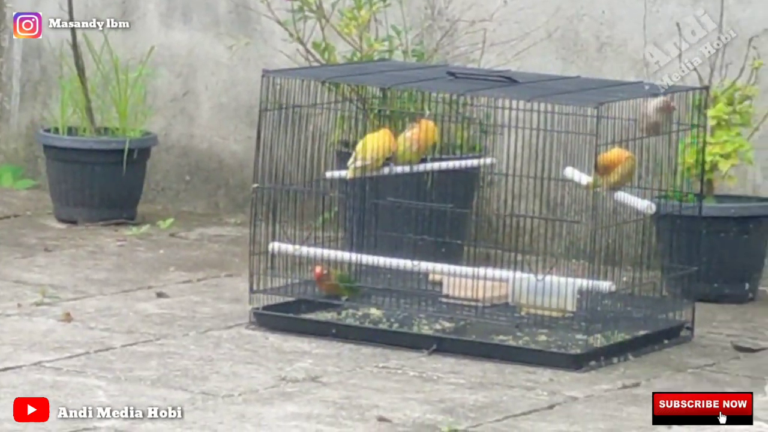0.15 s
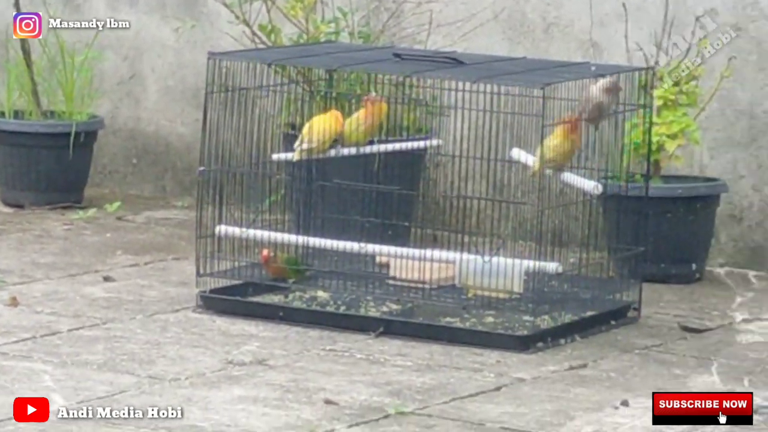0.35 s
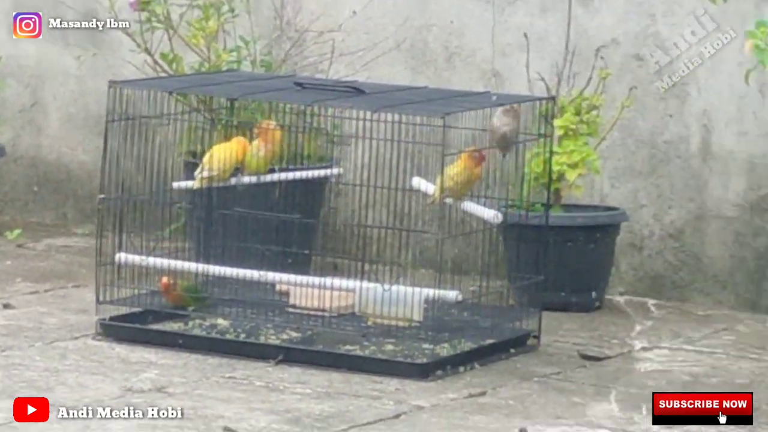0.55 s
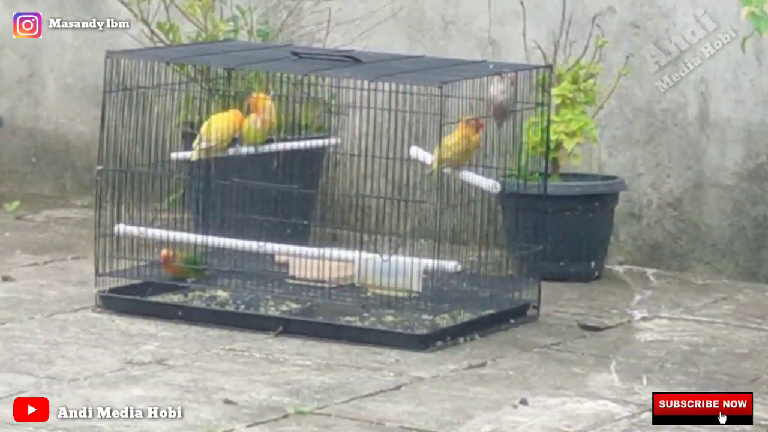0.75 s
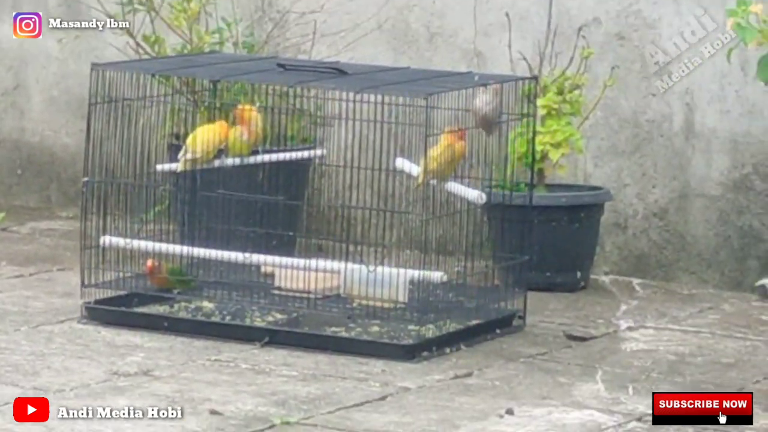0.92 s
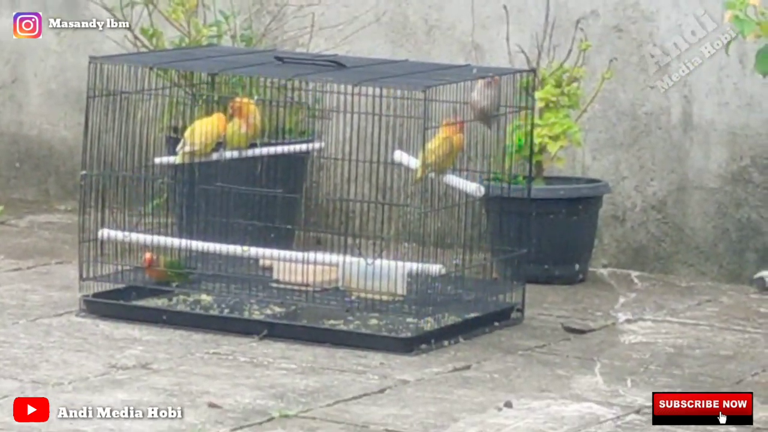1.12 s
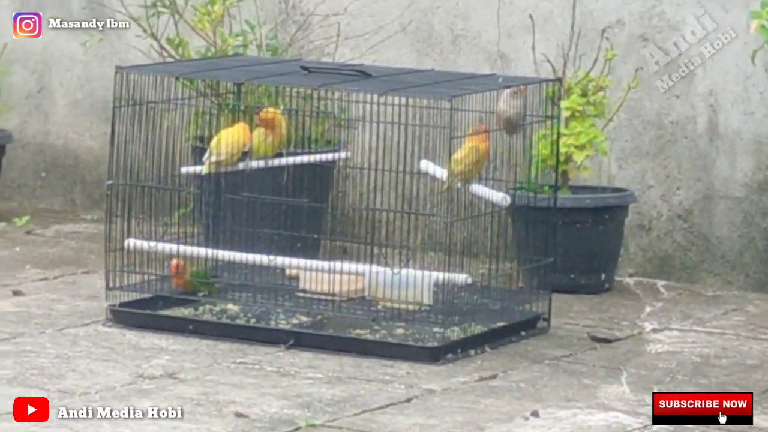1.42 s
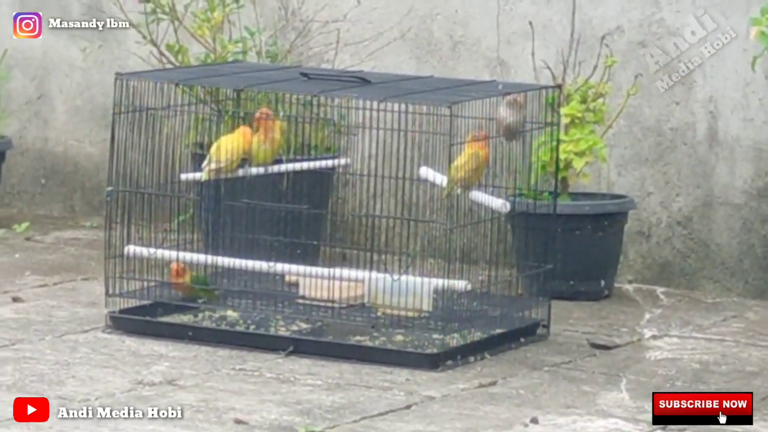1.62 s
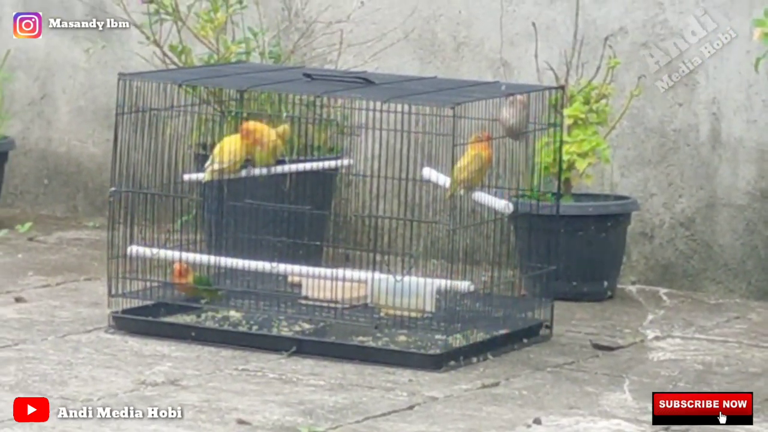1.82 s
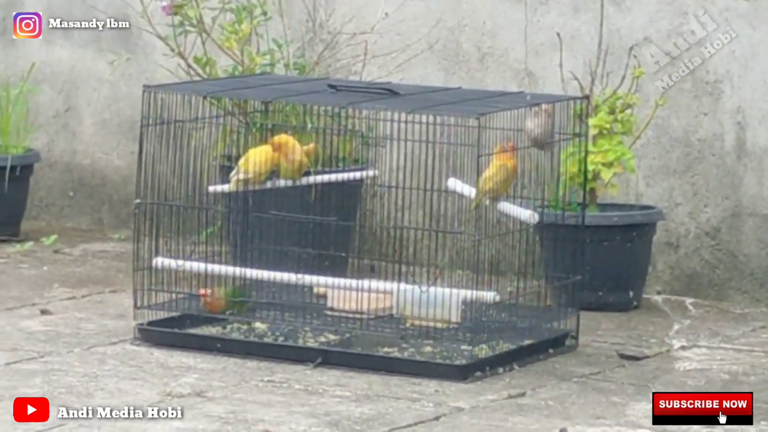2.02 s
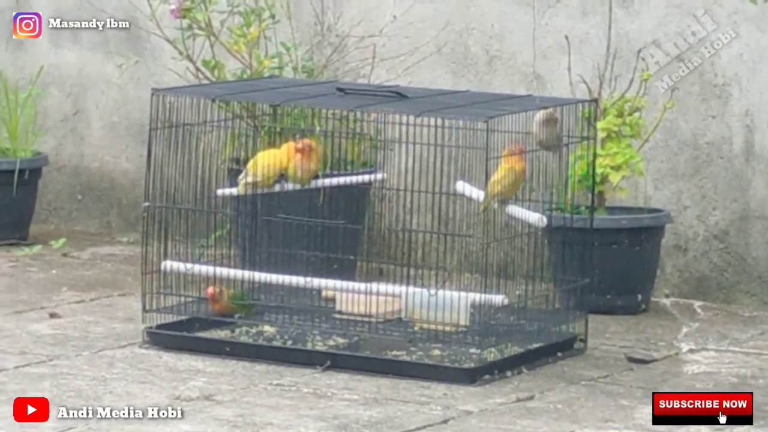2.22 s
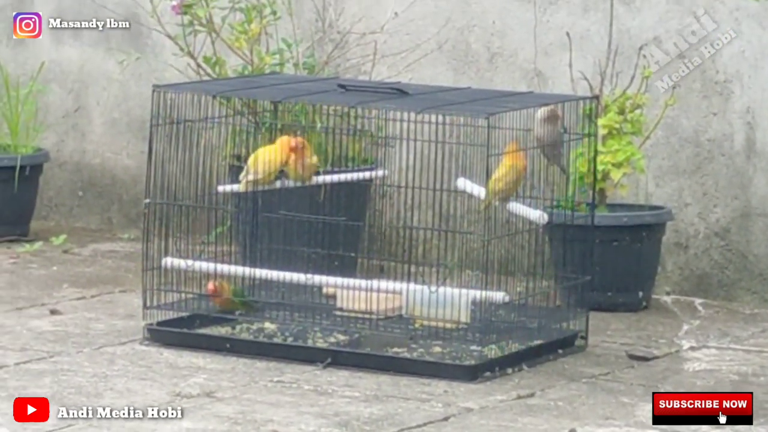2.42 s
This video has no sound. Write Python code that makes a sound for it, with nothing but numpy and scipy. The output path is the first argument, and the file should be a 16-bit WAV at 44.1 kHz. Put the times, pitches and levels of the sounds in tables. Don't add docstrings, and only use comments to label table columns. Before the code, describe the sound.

Bright, rapid parrot chatter with whistles, squeaks and hoarse notes rings in a walled yard over low distant traffic, with handling creaks at first and cage knocks, a hard click and a brief rustle near the end.

```python
import sys
import numpy as np
from scipy import signal
from scipy.fft import rfft, irfft
from scipy.io import wavfile
from scipy.ndimage import uniform_filter1d

SR = 44100
rng = np.random.default_rng(int(sys.argv[2]) if len(sys.argv) > 2 else 0)


def pcm_store(signal):
    levels = np.round(np.clip(np.atleast_2d(signal), -1, 1) * 32767)
    wavfile.write(sys.argv[1], SR, levels.astype(np.int16).T)


def ratio_of_db(decibels):
    return 10 ** (np.asarray(decibels, float) / 20)


N = 112454
TOP_HZ = 15700


def band(x, lo_hz, hi_hz, order=2):
    edges_hz = [lo_hz, min(hi_hz, 0.45 * SR)]
    return signal.sosfilt(signal.butter(order, edges_hz, "band", fs=SR, output="sos"), x)


def unit(x):
    return x / np.sqrt(np.mean(x ** 2))


def noise_band(size, lo_hz, hi_hz, order=2):
    return band(rng.standard_normal(size), lo_hz, hi_hz, order)


def walk(rate_hz, size=N):
    hold = max(int(SR / rate_hz), 1)
    steps = np.repeat(rng.standard_normal(size // hold + 1), hold)
    return 1.38 * uniform_filter1d(uniform_filter1d(steps, hold), hold)[:size]


def ring(hz, t60_s, size=3000):
    t = np.arange(size) / SR
    return np.sin(2 * np.pi * hz * t) * ratio_of_db(-60 * t / t60_s)


def add(out, start_s, x):
    i = int(start_s * SR)
    out[i:i + len(x)] += x[:N - i]


def town():
    # hz, level_db (per Hz)
    spectrum = [(15, -31), (25, -1.5), (183, 1), (313, -15), (945, -16), (5140, -25.5), (6550, -30.5),
                (15500, -48)]
    curve_hz, curve_db = np.array(spectrum).T
    t, swell = np.arange(N) / SR, walk(0.93)
    air = np.zeros(N)
    for hz in 28 * 2 ** np.arange(0, 9.5, 0.5):
        density_db = np.interp(np.log(hz), np.log(curve_hz), curve_db)
        level_db = density_db + 10 * np.log10(hz) + 1.2 * swell + 1.6 * walk(9)
        air += ratio_of_db(level_db) * unit(noise_band(N, hz / 1.208, hz * 1.22))
    hum_hz = 62 * (1 + 0.07 * walk(7.7))
    hum = np.sin(2 * np.pi * np.cumsum(hum_hz) / SR) * ratio_of_db(-51.5 + 2.5 * walk(6.74))
    moving = np.clip((0.55 - t) / 0.047, 0, 1) + 1.7 * np.clip((t - 2.49) / 0.054, 0, 1)
    rumble = ratio_of_db(-50) * moving * unit(noise_band(N, 86, 433, order=4))
    return unit(air) * ratio_of_db(-50) + hum + rumble


def earlier_calls():
    t, noise = np.arange(N) / SR, rng.standard_normal(N)
    tail = unit(band(noise, 3600, 4930, order=4))
    tail += ratio_of_db(-12.5) * unit(band(noise, 7300, 14600))
    tail += ratio_of_db(-11) * unit(band(noise, 2100, 4160))
    t60_s = 0.61
    return tail * ratio_of_db(-37.5 - 60 * t / t60_s + 1.8 * walk(54.0))


def creak():
    # start_s, peak_db
    slips = [(0.016, -30.5), (0.045, -32.5), (0.066, -37), (0.091, -36), (0.117, -41.5), (0.145, -43),
             (0.165, -62), (0.182, -42.5), (0.218, -33.5), (0.241, -43), (0.267, -37), (0.301, -31.5),
             (0.33, -32), (0.358, -29.5), (0.381, -38), (0.396, -36), (0.418, -44), (0.434, -42),
             (0.452, -36), (0.47, -34)]
    # time_s, low_hz, upper_hz
    drift = [(0, 550, 910), (.2, 544, 980), (.3, 587, 1488), (.5, 586, 1356)]
    at_s, low_hz, upper_hz = np.array(drift).T
    out = np.zeros(N)
    for start_s, db in slips:
        slip = ring(np.interp(start_s, at_s, low_hz), 0.037)
        slip += ratio_of_db(-5.5) * ring(np.interp(start_s, at_s, upper_hz), 0.034)
        slip += ratio_of_db(-6.5) * ring(390, 0.0095)
        add(out, start_s, ratio_of_db(db) * slip)
    return out


def knocks():
    # start_s, peak_db
    blows = [(1.297, -37), (1.501, -40), (1.629, -38.5), (1.655, -37.5), (1.91, -42), (1.985, -40),
             (2.197, -39), (2.212, -51), (2.364, -37), (2.376, -30), (2.405, -32), (2.42, -38),
             (2.536, -49)]
    # hz, level_db, t60_s
    metal = [(660, -5.5, 0.046), (1167, 3.5, 0.035), (1837, 7.5, 0.02), (2500, -0.5, 0.033)]
    out, t = np.zeros(N), np.arange(3000) / SR
    for start_s, db in blows:
        modes = np.zeros(3000)
        for hz, level_db, t60_s in metal:
            change = rng.standard_normal()
            modes += ratio_of_db(level_db + 1.3 * change) * ring(hz * (1 + 0.052 * change), t60_s)
        crack = unit(noise_band(3000, 610, 4100, order=1)) * ratio_of_db(-7.5 - 60 * t / 0.22)
        add(out, start_s, ratio_of_db(db - 6) * (modes + crack))
    return out


def wire_clicks():
    # start_s, peak_db
    clicks = [
        (2.352, -47),
        (2.377, -19.5),
        (2.406, -53),
        (2.456, -56),
        (2.468, -41.5),
    ]
    out, t = np.zeros(N), np.arange(600) / SR
    for start_s, db in clicks:
        add(out, start_s, ratio_of_db(db) * noise_band(600, 6500, 16000) * ratio_of_db(-60 * t / 0.0055))
    return out


def rustle():
    t = np.arange(N) / SR
    swell = np.clip((t - 2.34) / 0.022, 0, 1) * np.clip((2.49 - t) / 0.13, 0, 1)
    return ratio_of_db(-51 + 3.4 * walk(150)) * swell * unit(noise_band(N, 450, 14000, order=1))


def yard(x):
    # delay_s, level_db
    slaps = [
        (.009, -13),
        (0.0165, -9.5),
        (.027, -13.5),
        (.047, -21),
    ]
    # hz, t60_s
    far_tail = [(1500, 0.3), (2200, 0.85), (3200, .8), (4600, 0.55), (6500, 0.52), (9200, 0.62),
                (13000, 0.5)]
    # hz, level_db
    beak = [(2000, -4.5), (4500, 0.5), (7000, -2), (9500, -5), (12000, 0), (15000, -3)]
    near_t60_s = 0.27
    t, response = np.arange(SR) / SR, np.zeros(SR)
    for hz, t60_s in far_tail:
        fade = ratio_of_db(-60 * t / near_t60_s) + ratio_of_db(-8.5 - 60 * t / t60_s)
        fade *= np.clip(t / 0.012, 0, 1)
        tail = noise_band(SR, hz / 1.14, hz * 1.225) * fade
        response += ratio_of_db(-9) * tail * np.sqrt(2 * np.log(1000) / near_t60_s / SR)
    response[0] += 1
    for delay_s, db in slaps:
        response[int(delay_s * SR)] += ratio_of_db(db)
    beak_hz, beak_db = np.array(beak).T
    hz = np.arange(N // 2 + 1) * SR / N + 1
    coloured = irfft(rfft(x) * ratio_of_db(np.interp(np.log(hz), np.log(beak_hz), beak_db)), N)
    return signal.fftconvolve(coloured, response)[:N]


def bird(notes, overtones_db, bend, ease, jitter, flutter_db, husk, rasp_db, attack_s=0.0014, release_s=0.0035):
    out = np.zeros(N)
    shake, flutter, grit = walk(900), walk(350), walk(2500)
    rasp = unit(noise_band(N, 2620, 10400))
    for start_s, length_s, from_hz, to_hz, db in notes:
        t = np.arange(int((length_s + release_s) * SR)) / SR
        first = int(start_s * SR)
        at = slice(first, first + len(t))
        glide = np.sin(np.pi / 2 * np.clip(t / length_s, 0, 1) ** bend) ** ease
        hz = (from_hz + (to_hz - from_hz) * glide) * (1 + jitter * shake[at])
        phase = 2 * np.pi * np.cumsum(hz) / SR + husk * grit[at]
        tone = np.zeros(len(t))
        for k, level_db in enumerate(overtones_db, 1):
            bloom = np.clip(2 * t / attack_s / k, 0, 1)
            audible = k * hz < TOP_HZ + 1000
            tone += ratio_of_db(level_db) * audible * bloom * np.sin(k * phase)
        shape = np.clip(np.minimum(t / attack_s, (t[-1] - t) / release_s), 0, 1)
        shape = shape * ratio_of_db(db + flutter_db * flutter[at])
        breath = ratio_of_db(rasp_db) * np.clip(t / 0.0068, 0, 1) * rasp[at]
        out[at] += shape * (np.sqrt(2) * tone + breath)
    return out


def pipes():
    # start_s, length_s, from_hz, to_hz, level_db
    piped = [(.614, 0.023, 1965, 2215, -43.5), (.711, 0.022, 2970, 3023, -28),
             (.864, 0.023, 3034, 3105, -28.5), (1.035, 0.012, 3050, 2920, -31),
             (1.234, 0.036, 3120, 3287, -25.5), (1.299, 0.018, 3210, 3540, -28),
             (.924, .03, 2074, 2450, -32), (1.726, 0.027, 2930, 2904, -24.5),
             (1.064, 0.018, 2232, 2397, -28), (1.215, .04, 2043, 2184, -33),
             (1.305, 0.035, 2740, 2820, -34.5), (1.398, 0.0053, 1900, 2030, -35),
             (1.441, 0.012, 2500, 2237, -28.5), (1.682, 0.03, 2375, 2427, -30),
             (1.821, 0.0054, 1945, 1947, -29), (1.879, 0.0081, 2600, 2515, -26.5),]
    overtones = [3.5, -14, -24, -7.5]
    return bird(piped, overtones, bend=0.93, ease=1, jitter=0.015, flutter_db=1.8, husk=0.17, rasp_db=-12)


def churrs():
    # start_s, length_s, from_hz, to_hz, level_db
    low_notes = [
        (.317, 0.013, 2467, 2370, -26),
        (.679, 0.044, 1254, 2105, -36),
        (.822, 0.045, 1240, 2122, -33.5),
        (.938, 0.022, 2713, 2090, -27.5),
        (.954, 0.011, 2095, 2132, -18.5),
    ]
    overtones = [-6, 6, -28.5, 1.5, -32, -4, -7]
    return bird(low_notes, overtones, bend=0.62, ease=0.9, jitter=0.016, flutter_db=2.2, husk=0.2,
                rasp_db=-13, attack_s=0.009)


def flicks():
    # start_s, length_s, from_hz, to_hz, level_db
    sweeps = [(.29, 0.007, 5510, 4270, -18), (.617, .007, 2500, 4240, -31.5), (.705, .007, 4330, 2930, -34),
              (.724, 0.0077, 4900, 6580, -27), (.861, .007, 3750, 3003, -25.5),
              (.881, .007, 4520, 5580, -28), (.967, 0.011, 2670, 6700, -32), (1.021, .005, 4100, 6100, -22),
              (1.057, 0.0093, 2980, 5060, -32.5), (1.14, 0.0042, 4650, 6750, -18),
              (1.295, .007, 2985, 4960, -18.5), (1.404, 0.0032, 2140, 3500, -27.5),
              (1.718, .01, 4370, 3040, -22.5), (1.737, 0.0059, 5140, 4150, -16),
              (1.807, 0.0081, 2690, 4030, -27.5), (1.835, .009, 8730, 6830, -32),
              (1.886, 0.0035, 4050, 8460, -19)]
    overtones = [0.5, -4.5, -20]
    return bird(sweeps, overtones, bend=1.109, ease=1.076, jitter=0.01, flutter_db=1.0, husk=0.46,
                rasp_db=-10, attack_s=0.001245, release_s=0.00098)


def whistles():
    # start_s, length_s, from_hz, to_hz, level_db
    pure_notes = [
        (1.075, 0.031, 3492, 3546, -12),
        (1.098, .017, 3760, 3844, -16),
        (1.119, 0.018, 4330, 4450, -14.5),
        (1.148, 0.02, 4320, 4640, -28),
        (1.722, 0.0116, 4670, 5054, -11.5),
        (.37, .016, 5970, 6050, -33),
        (2.296, .05, 3200, 3000, -54.5),
        (2.487, .035, 3030, 2850, -50.5),
    ]
    overtones = [-1, -37]
    return bird(pure_notes, overtones, bend=1.0, ease=1.7, jitter=0.0076, flutter_db=2.1, husk=0.066, rasp_db=-15)


def squeaks():
    # start_s, length_s, from_hz, to_hz, level_db
    pair = [
        (1.561, 0.029, 5250, 6150, -20.5),
        (1.563, .028, 5440, 6405, -23),
    ]
    overtones = [8.5, -7.5]
    return bird(pair, overtones, bend=0.855, ease=0.86, jitter=0.0047, flutter_db=0.0, husk=0.12,
                rasp_db=-16, attack_s=0.0091)


def screeches():
    # start_s, length_s, from_hz, to_hz, level_db
    hoarse = [(.207, 0.025, 5460, 4930, -21.5), (.549, 0.02, 6500, 6100, -36),
              (1.025, 0.0085, 6350, 5380, -20), (1.125, 0.049, 3202, 2847, -22.5),
              (1.144, 0.039, 6620, 6610, -23.5), (1.32, .028, 5240, 6250, -22),
              (1.427, .016, 3316, 3992, -20), (1.452, .018, 3484, 3670, -25),
              (1.666, 0.012, 3650, 3610, -21), (1.68, .014, 5600, 6360, -35), (1.684, .02, 3474, 3910, -28),
              (1.82, .022, 3790, 4280, -26.5), (1.842, 0.031, 3632, 3780, -19.5)]
    overtones = [-0.5, -6.5, -9.5]
    return bird(hoarse, overtones, bend=0.9, ease=1.1, jitter=0.03, flutter_db=3, husk=0.55,
                rasp_db=-12, attack_s=0.005)


def shrieks():
    # start_s, length_s, from_hz, to_hz, level_db
    full_notes = [
        (.183, .019, 3280, 3497, -25),
        (.197, 0.013, 3493, 5460, -20.5),
        (.214, 0.058, 3473, 3130, -21),
        (.264, .054, 3060, 2987, -28),
        (.551, 0.015, 4920, 4794, -30),
        (.969, .01, 3640, 3060, -21),
        (.979, 0.036, 3010, 2958, -23),
        (1.016, 0.0153, 3053, 2840, -28),
        (1.412, 0.019, 3570, 3160, -26),
        (1.65, 0.016, 2490, 2490, -28),
    ]
    overtones = [-1.5, -2, -10, -5, -10]
    return bird(full_notes, overtones, bend=1.2, ease=1.983, jitter=0.016, flutter_db=2.5, husk=0.079, rasp_db=-18.0)


def peeps():
    # start_s, length_s, from_hz, to_hz, level_db
    thin_notes = [(.298, 0.011, 4380, 4790, -16.5), (.331, 0.014, 4492, 4388, -12.5),
                  (.542, 0.0089, 6830, 5050, -27), (.737, 0.015, 5770, 4940, -22),
                  (.889, 0.022, 4900, 4880, -28), (1.034, 0.032, 5200, 5000, -25.5),
                  (1.161, 0.01, 5050, 4350, -11), (1.174, 0.038, 4385, 4915, -13),
                  (1.203, 0.02, 5035, 6270, -14.5), (1.221, 0.017, 6510, 5440, -13),
                  (1.252, 0.012, 3630, 5110, -14.5), (1.27, .006, 4900, 4460, -23.5),
                  (1.278, 0.0079, 3900, 3070, -14), (1.442, 0.0098, 4380, 4650, -20.5),
                  (1.449, 0.015, 5300, 5700, -19.5), (1.696, 0.022, 4150, 4700, -17),
                  (1.844, 0.01, 6320, 5760, -17), (1.854, 0.008, 5690, 5200, -14.5),
                  (1.866, 0.0078, 5016, 4320, -14.5), (1.886, 0.0058, 4500, 4660, -11.5),
                  (1.895, 0.0056, 4770, 5310, -15.5)]
    overtones = [-2.5, -12, -13]
    return bird(thin_notes, overtones, bend=1, ease=2, jitter=0.009, flutter_db=1.8, husk=0.17, rasp_db=-22)


def scene():
    birds = pipes() + churrs() + flicks() + whistles() + squeaks() + screeches() + shrieks() + peeps()
    close = creak() + knocks() + wire_clicks() + rustle()
    mix = town() + earlier_calls() + close + ratio_of_db(-2.0) * yard(birds)
    return mix[None]


def top_cut(x):
    return signal.sosfilt(signal.butter(12, 16820, fs=SR, output="sos"), x)


def record(dry):
    cut = signal.sosfilt(signal.ellip(8, 0.2, 70, TOP_HZ, fs=SR, output="sos"), dry)
    return top_cut(cut)


dry = scene()
out = record(dry)
pcm_store(out)
```